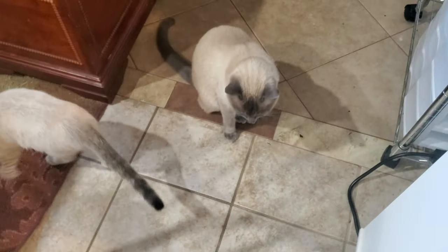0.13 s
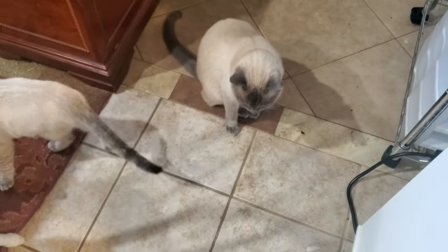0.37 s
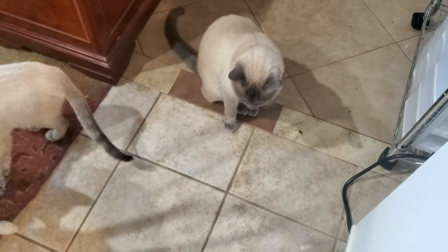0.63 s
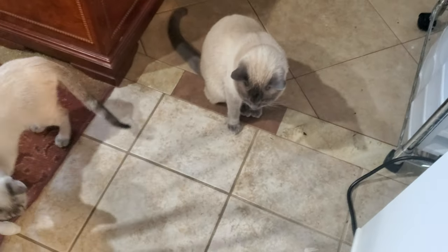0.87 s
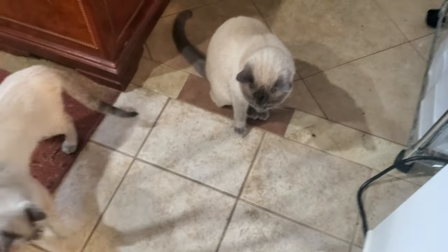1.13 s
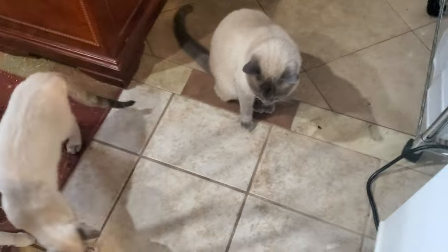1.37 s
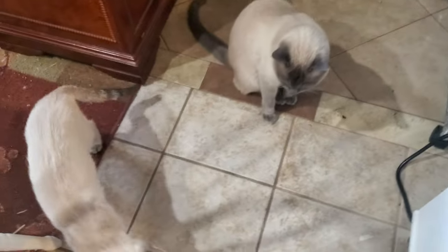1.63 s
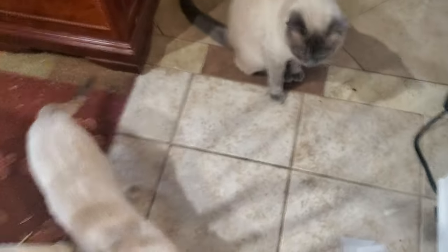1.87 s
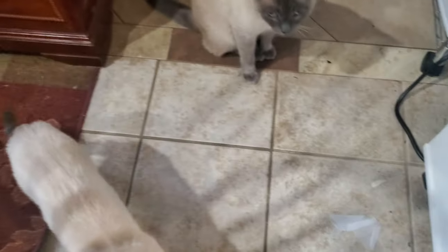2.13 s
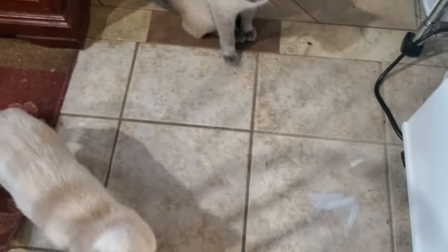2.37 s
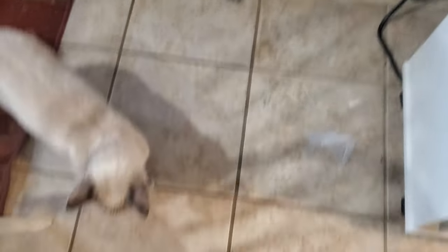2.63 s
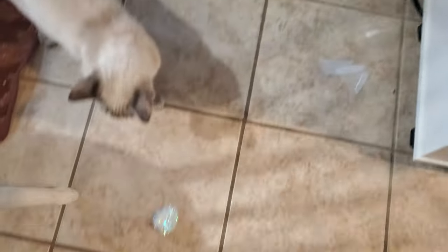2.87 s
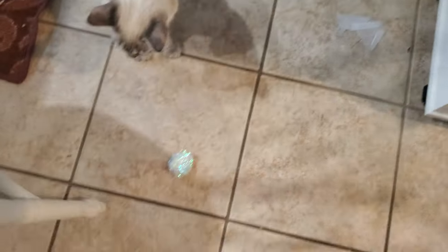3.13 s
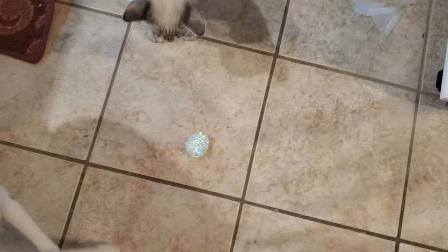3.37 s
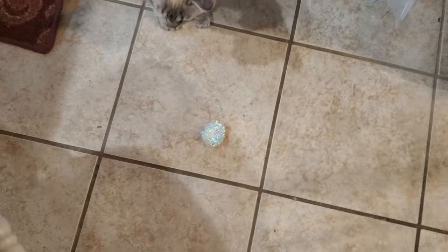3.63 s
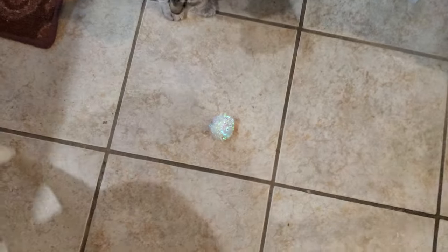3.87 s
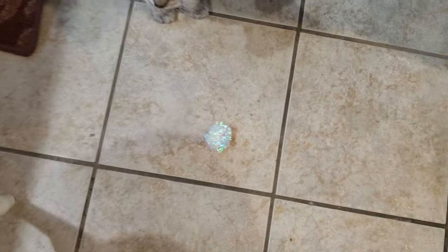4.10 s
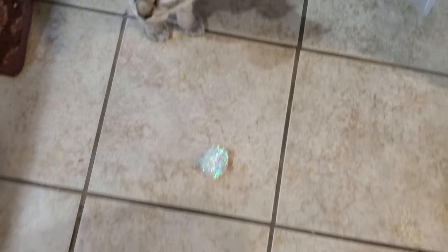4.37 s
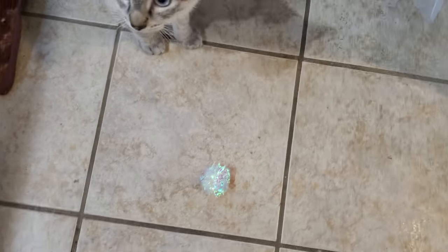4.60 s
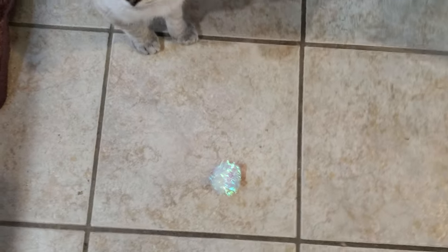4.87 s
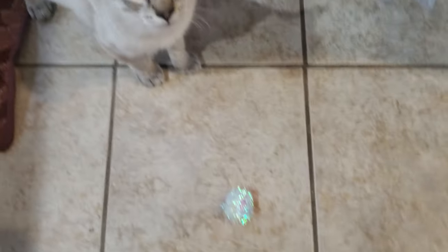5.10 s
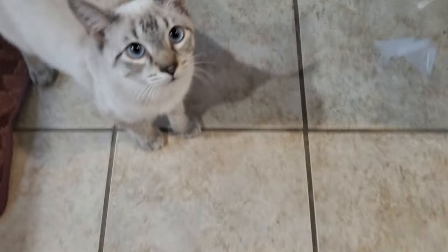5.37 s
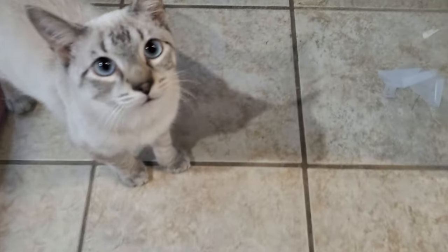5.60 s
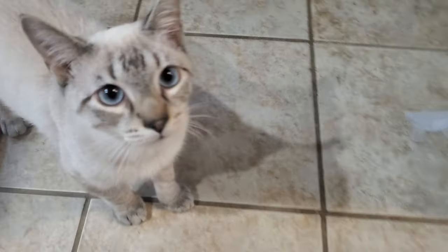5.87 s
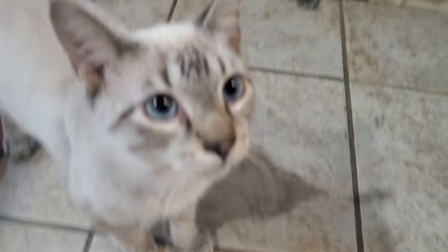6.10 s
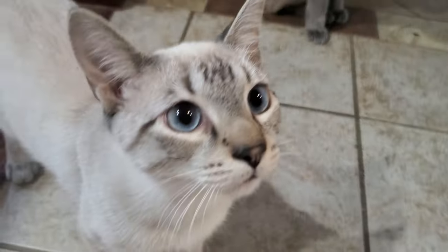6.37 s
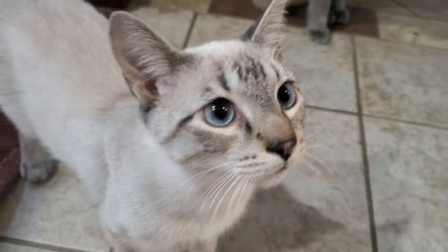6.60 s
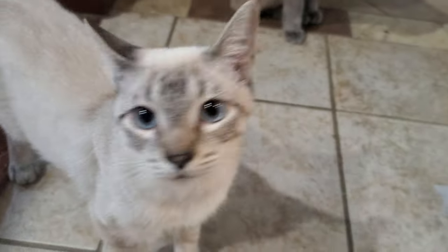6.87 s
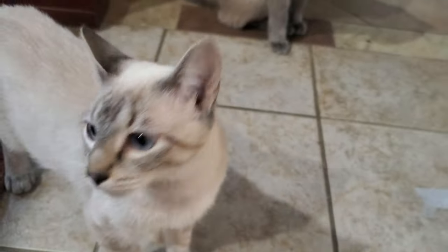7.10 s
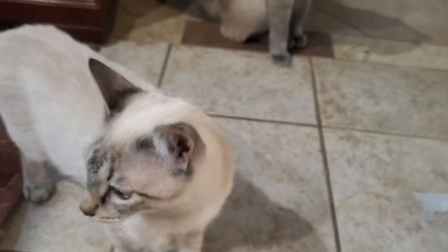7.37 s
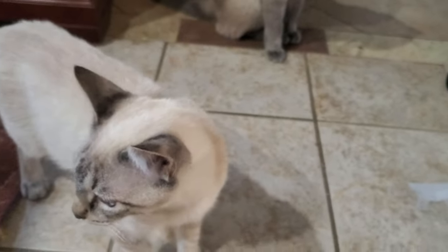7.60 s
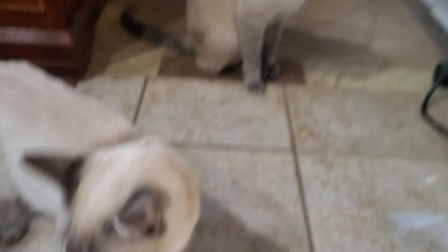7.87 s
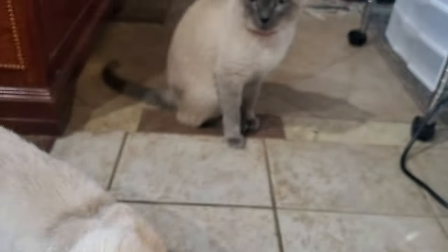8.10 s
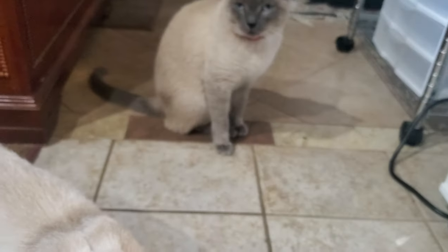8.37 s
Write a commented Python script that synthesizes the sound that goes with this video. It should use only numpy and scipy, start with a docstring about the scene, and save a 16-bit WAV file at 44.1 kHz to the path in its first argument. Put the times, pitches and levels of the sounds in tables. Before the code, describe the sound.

Over a steady room hum, close finger clicks and rubs, then a hollow plastic object trundles and knocks across a tile floor, then soft taps.

```python
"""A steady hum lies under everything; early on, fingers click, rub and thump close by on a hand-held phone.
Then a hollow plastic thing trundles over a kitchen's tile floor, rattling and knocking at the joints, and
the phone is touched again after it. Clicks, grit and knocks are noise pushes that ring tables of resonances;
strokes, soft rustles and hum are shaped noise, and taps are decaying sines.
The phone's two microphone ports make the stereo pair; hard walls answer the cart."""
import sys
import numpy as np
from scipy import signal
from scipy.fft import rfft, irfft, next_fast_len
from scipy.io import wavfile
from scipy.ndimage import map_coordinates

SR = 44100
rng = np.random.default_rng(int(sys.argv[2]) if len(sys.argv) > 2 else 0)


def inscribe(sig):
    """Save sig as 16-bit PCM at rate SR to the path in sys.argv[1].

    A 1-D sig is mono; a 2-D sig holds one channel per row.
    Samples are clipped to [-1, 1] before scaling.
    """
    pcm = np.round(np.clip(np.atleast_2d(sig).T, -1, 1) * 32767)
    wavfile.write(sys.argv[1], SR, pcm.astype(np.int16))


def gain_from_db(level_db):
    """Convert decibel levels to linear amplitude factors (20 dB per decade)."""
    decades = np.asarray(level_db, float) / 20
    return 10 ** decades


N = 373997

# Resonances of the cart's hollow body. Each row: frequency in Hz, width in Hz, level in dB.
BODY_MODES = [(110, 51, -5.5), (208, 65, -1.5), (272.7, 98, 1.5), (562, 45, 6), (660, 123, 3),
              (808, 116, 6.5), (1074, 233, -2), (1394, 600, -7.5)]
# Resonances of its hard shell. Each row: frequency in Hz, width in Hz, level in dB.
SHELL_MODES = [(1574, 390, 1), (1947, 310, -0.5), (2534, 198, 11), (2810, 330, -1), (3300, 400, -4),
               (4140, 360, -12), (5550, 124, -11), (6360, 600, -11.5)]
DETUNE = 0.021  # fraction by which the cart's modes shift
SHELL_BLUR = 2.4  # contact damps the shell and widens its modes by this factor


def unit(x):
    """Brought to rms 1."""
    return x / np.sqrt(np.mean(x ** 2) + 1e-20)


def along(points, hz):
    """Values read from (Hz, value) points on a log frequency axis."""
    f, v = np.transpose(points)
    return np.interp(np.log(hz + 1), np.log(f + 1), v)


def gains(rows):
    """Gain per sample for each dB column after the time; silent before and after."""
    s, *cols = np.transpose(rows)
    return [gain_from_db(np.interp(np.arange(N) / SR, s, c, -140, -140)) for c in cols]


def humps(table, steep):
    """Gain per sample for each dB column after centre and length: swells, squarer as steep grows."""
    rows, t = np.array(table), np.arange(N) / SR
    swells = np.exp(-np.abs(2.18 * (t - rows[:, :1]) / rows[:, 1:2]) ** steep)
    return gain_from_db(rows[:, 2:]).T @ swells


def wobble(rate):
    """A smooth random curve, rate knots a second."""
    knots = rng.standard_normal(int(N * rate / SR) + 4)
    return map_coordinates(knots, [np.arange(N) * rate / SR])


def filtered(x, response):
    """x times a complex response of frequency."""
    n = x.shape[-1]
    m = next_fast_len(n + SR // 4)
    return irfft(rfft(x, m) * response(np.fft.rfftfreq(m, 1 / SR)), m)[..., :n]


def modes(table, order=1):
    """Causal response of (Hz, width, dB) resonances; order 2 has steeper flanks."""
    def response(f):
        total = 0
        for k, (centre, width, db) in enumerate(table):
            resonance = 1j * f * width / (centre ** 2 - f ** 2 + 1j * f * width)
            total = total + (-1) ** (k * order) * gain_from_db(db) * resonance ** order
        return total
    return response


def struck(shape, table, peak_db, blow=0, order=1):
    """Random pushes under shape, led by one firm blow, ring the modes; scaled to its peak."""
    push = shape * rng.standard_normal(len(shape))
    push[np.argmax(shape)] += blow
    ring = filtered(push, modes(table, order))
    return gain_from_db(peak_db) * ring / np.abs(ring).max()


def pair_noise(spectrum, alike):
    """Stereo noise of rms 1 with a (Hz, dB) spectrum, whose sides agree by (Hz, correlation)."""
    def mid_and_side(hz):
        turn = np.arccos(np.clip(along(alike, hz), -1, 1)) / 2
        return gain_from_db(along(spectrum, hz)) * [np.cos(turn), np.sin(turn)]
    mid, side = filtered(rng.standard_normal((2, N)), mid_and_side)
    return unit(np.array([mid + side, mid - side]))


def rolling():
    """Grit under the wheels pushes body and shell steadily, in grains and in small dry crackles."""
    # The push across the tiles, then a short nudge. Each row: time in seconds, body in dB, shell in dB.
    push = [(2.08, -67.5, -50), (2.27, -58, -49.5), (2.31, -46.5, -50), (2.56, -46.5, -48),
            (2.74, -40, -42.5), (3.04, -42.5, -48), (3.2, -36, -44.5), (3.82, -40.5, -46.5),
            (3.93, -34.5, -47), (4.36, -36.5, -43.5), (4.641, -38, -50), (4.8, -61.5, -102),
            (4.955, -66, -55), (4.969, -42, -46.5), (5.052, -41, -51), (5.201, -66.5, -59)]
    # The nudge drags the deep body. Each row: centre in seconds, length in seconds, level in dB.
    drag = [(5.06, 0.12, -41)]
    # Two thin shell modes sing along. Each row: centre and length in seconds, lower and upper mode in dB.
    thin = [(2.85, 0.85, -58.5, -57.5), (3.4, 0.56, -54, -78)]
    grains_per_s, crackles_per_s, crackle_db = 99, 90, -5  # crackles are set against the shell's rub
    waver_db = 3.5  # unevenness of the rub

    grains = (rng.random(N) < grains_per_s / SR) * rng.exponential(size=N)
    # each grain jolts the whole thing for some ms, over the steady rub
    bumps = 1 + signal.lfilter([1], [1, -np.exp(-1 / (SR * 0.0019))], grains)
    body, shell = gains(push)
    deep = body + humps(drag, steep=2.4)[0]
    upper = body * np.where(np.arange(N) < 3.4 * SR, gain_from_db(-7.5), 1)  # upper body modes are damped at first
    thin_low, thin_high = humps(thin, steep=2.2)
    layers = [(deep, BODY_MODES[:3]), (body, BODY_MODES[3:5]), (upper, BODY_MODES[5:]),
              (shell, SHELL_MODES[:5]), (thin_low, SHELL_MODES[5:6]), (thin_high, SHELL_MODES[6:7])]
    out = 0
    for gain, table in layers:
        # each mode wavers between a low and a high form as the wheels meet other grit
        rub = 0
        for hz, width, db in table:
            for way in (-1, 1):
                grit = bumps * gain_from_db(waver_db * wobble(11)) * rng.standard_normal(N)
                rub = rub + filtered(grit, modes([(hz * (1 + way * DETUNE), width, db)], order=2))
        out = out + gain * unit(rub)

    sparks = (rng.random(N) < crackles_per_s / SR) * rng.exponential(size=N) ** 2
    crackle = signal.lfilter([1], [1, -np.exp(-1 / (SR * 0.0013))], sparks) * rng.standard_normal(N)
    damped = [(hz, SHELL_BLUR * width, db / 2) for hz, width, db in SHELL_MODES[:6]]
    return out + shell * gain_from_db(crackle_db) * unit(filtered(crackle, modes(damped, order=2)))


def knocking():
    """Each joint is a firm blow with a dying chatter of loose parts, and one softer rebound."""
    # Knocks at the tile joints. Each row: time in seconds, hollow body in dB, shell in dB, thin snap in dB.
    joints = [(3.1027, -21, -31, -39), (3.4044, -27.5, -26, -46), (3.7035, -14.5, -47, -56),
              (3.8631, -18, -1, -15.5), (3.9969, -7, -11, -36), (4.1472, -9.5, -2, -17),
              (4.2946, -15.5, -22.5, -50), (4.4428, -24, -15.5, -33), (4.5557, -29, -15, -50),
              (4.599, -19.5, -11.5, -30)]
    # Dull bumps that only the body feels. Each row: time in seconds, body in dB.
    dull_bumps = [(2.696, -33), (2.889, -27), (3.293, -26.5), (4.1034, -18.5), (4.618, -17), (5.0254, -27)]
    rebound_s, rebound_body_db, rebound_shell_db = 0.0505, -8.5, -13
    deep_db, chatter_db = -15, -18  # deep body under the hollow body; chatter under the blow's peak
    body_blur, chatter_blur = 1.78, 2  # widening of the modes
    scatter_db, soft_hz = 3.5, 3900  # no two blows land on the same spot; the blow is soft above soft_hz

    soft, snaps = np.zeros((2, N + SR))
    t = np.arange(SR // 6) / SR
    contact = gain_from_db(-60 * t / 0.0292) * (1 - np.exp(-t / 0.001607))
    blows = list(joints) + [(s, db, -140, -140) for s, db in dull_bumps]
    rebounds = [(s + rebound_s, body_db + rebound_body_db, shell_db + rebound_shell_db,
                 thin_db + rebound_shell_db) for s, body_db, shell_db, thin_db in blows]
    for s, body_db, shell_db, thin_db in blows + rebounds:
        loose = np.interp(t, np.arange(70) / 400, rng.standard_normal(70))  # loose parts rattle on unevenly
        chatter = gain_from_db(-60 * t / 0.2 + 7.0 * loose) * (1 - np.exp(-t / 0.0024))
        parts = [(soft, shell_db, SHELL_MODES[:6], SHELL_BLUR),
                 (soft, body_db, BODY_MODES[4:], body_blur),
                 (snaps, thin_db, SHELL_MODES[5:], SHELL_BLUR),
                 (soft, body_db + deep_db, BODY_MODES[:3], body_blur)]
        for track, db, table, blur in parts:
            luck = rng.standard_normal((len(table), 2))
            spot = [(hz * (1 + DETUNE * a), width, level + scatter_db * b)
                    for (hz, width, level), (a, b) in zip(table, luck)]
            damped = [(hz, blur * width, level) for hz, width, level in spot]
            rattling = [(hz, chatter_blur * width, level) for hz, width, level in spot]
            hit = struck(contact, damped, db, blow=2.8, order=2)
            rattle = struck(chatter, rattling, db + chatter_db, order=2)
            track[round(s * SR):][:len(t)] += hit + rattle
    return snaps[:N] + filtered(soft[:N], lambda hz: 1.66 / (1 + 1j * hz / soft_hz) ** 2)


def clicks():
    """A sharp slip of a few ms sets the case ringing; each port feels it through its own path."""
    # Dry clicks close by. Each row: time in seconds, dull part in dB, bright part in dB, left over right in dB.
    slips = [(0.488, -55, -29, 13.5), (0.977, -23.5, -45, -6), (1.003, -30, -34, 1), (1.02, -36, -31, -4),
             (1.039, -26, -41, 19.5), (1.081, -11, -13.5, 15), (1.148, -11.5, -12, 2.5),
             (1.217, -17.5, -19, 24.5), (1.245, -1.5, -21, 1), (1.332, -21, -28, 8), (1.347, -5, -15.5, 8),
             (1.364, -10, -11, 10), (1.371, -19, -47, 16), (1.619, -13, -1.5, 6.5), (1.753, -32.5, -20, 22),
             (1.871, -27.5, -24, 4)]
    # What the case rings with. Each row: frequency in Hz, width in Hz, level in dB.
    case = [(356, 250, 2), (757, 183, 6), (1406, 168, 1), (1930, 335, 9.5), (3080, 450, 6), (3750, 1200, 1),
            (5030, 3800, -9)]
    out, t = np.zeros((2, N + SR)), np.arange(SR // 25) / SR - .004
    # a weak lead-in, then the snap
    shape = np.where(t < 0, 0.32 * gain_from_db(60 * t / 0.0038), gain_from_db(-60 * t / 0.0074))
    for s, dull_db, bright_db, pan_db in slips:
        for port, side_db in zip(out, (pan_db / 2, -pan_db / 2)):
            dull = struck(shape, case[:3], dull_db + side_db)
            bright = struck(shape, case[3:], bright_db + side_db)
            port[round((s - .003) * SR):][:len(t)] += dull + bright
    return filtered(out[:, :N], lambda hz: 1 / (1 + 1j * hz / 9000) ** 2)


def strokes():
    """Skin slides along the case in uneven slips with a hiss on top."""
    # Finger strokes. Each row: centre in seconds, length in seconds, rub in dB, hiss in dB.
    slides = [(.515, 0.072, -48, -45), (.69, 0.077, -46.5, -46), (1.035, 0.068, -43, -39.5),
              (1.24, 0.088, -31, -43), (1.28, 0.034, -29.5, -34.5), (1.36, 0.04, -33, -72),
              (1.763, 0.015, -36.5, -35), (1.888, 0.037, -44, -29), (6.565, 0.12, -37.5, -45.5),
              (7.13, 0.043, -46, -72.5)]
    # Spectrum of the rub. Each row: frequency in Hz, level in dB.
    rub_spectrum = [(100, -13.5), (250, -2), (700, -7.5), (2600, -7.5), (6000, -42), (10000, -58)]
    hiss_spectrum = [(2500, 8.0), (6000, 7), (12000, -8.0), (16000, -1.0)]  # Hz, dB
    rub, hiss = humps(slides, steep=3.1)
    slips = gain_from_db(3 * wobble(400))
    skin = slips * rub * pair_noise(rub_spectrum, [(1000, 0.24)])
    return skin + hiss * pair_noise(hiss_spectrum, [(9000, 0.09)])


def taps():
    """Single soft taps on the case: a low decaying sine, equal at both ports."""
    # Each row: start in seconds, level in dB.
    touches = [(5.495, -37), (5.89, -45), (5.945, -45), (6.191, -34.5), (6.526, -28)]
    tap_hz, decay_s = 65.3, 0.085  # decay_s is the time to fall 60 dB
    out, t = np.zeros(N + SR), np.arange(SR // 5) / SR
    for s, db in touches:
        onset = 1 - np.exp(-t / 0.0037)
        out[round(s * SR):][:len(t)] += gain_from_db(db - 60 * t / decay_s) * np.sin(2 * np.pi * tap_hz * t) * onset
    return out[:N]


def thumps():
    """The grip shifts and thumps the case: swells of low noise, largely alike at the two ports."""
    # Shifts of the grip. Each row: centre in seconds, length in seconds, level in dB.
    shifts = [(.52, 0.16, -55.5), (1.03, 0.075, -40), (1.13, 0.075, -37.5), (1.25, 0.094, -37),
              (1.345, 0.088, -35), (1.763, 0.054, -47), (1.888, 0.057, -36), (3.25, 0.37, -48.5),
              (6.57, 0.13, -47)]
    # Spectrum of a thump. Each row: frequency in Hz, level in dB.
    low_spectrum = [(15, -53), (55, 0.5), (130, -7), (400, -47.5)]
    return humps(shifts, steep=4.8)[0] * pair_noise(low_spectrum, [(50, 0.73)])


def rustle():
    """Fur or cloth brushing: a soft hiss that swells briefly over a slowly changing treble hiss."""
    # Soft rustles. Each row: centre in seconds, length in seconds, level in dB.
    swells = [(1.84, 0.037, -41.5), (2.1, 0.74, -54), (2.85, 0.25, -49), (3.16, 0.13, -54),
              (5.16, 0.094, -48), (6.5, 0.15, -54)]
    # A slowly rising and falling treble hiss under the rustles. Each row: time in seconds, level in dB.
    treble_hiss = [(1.7, -99), (1.9, -49.5), (2.5, -68), (4.1, -48), (4.8, -59), (7.5, -75)]
    # Spectrum of the hiss. Each row: frequency in Hz, level in dB.
    fabric = [(1200, -49), (2800, 14.5), (6700, 14), (8500, 5), (15000, 2)]
    level = humps(swells, steep=1.46)[0] + gains(treble_hiss)[0]
    return level * gain_from_db(1.35 * wobble(28)) * pair_noise(fabric, [(3000, 0.18), (9000, 0.014)])


def room(x, count=20):
    """Hard walls answer, differently at each port and in each stretch of time; decay varies with pitch."""
    # Each row: frequency in Hz, time to fall 60 dB in seconds.
    decay = [(200, 0.079), (9000, 0.39)]
    out = np.zeros((2, N + SR))
    for part in np.array_split(np.arange(N), count):
        hz, t, z = signal.stft(rng.standard_normal((2, SR // 3)), SR, nperseg=256)
        fading = z * gain_from_db(-60 * t / along(decay, hz)[:, None])
        tail = signal.istft(fading, SR, nperseg=256)[1]
        answer = signal.fftconvolve(x[None, part], tail / np.linalg.norm(tail[0]), axes=1)
        out[:, part[0] + 200:][:, :answer.shape[1]] += answer  # the answer comes 200 samples late
    return out[:, :N]


def hum():
    """The steady noise of the room and its appliances, drifting slightly in level."""
    # Spectrum of the hum. Each row: frequency in Hz, level in dB.
    spectrum = [(20, -21), (76, -4.5), (225, -11.5), (280, -5.5), (633, -3.5), (1000, -14.5), (1260, -2),
                (1500, -6.5), (3200, -11), (4130, -24), (6910, -14.5), (8140, -35), (16500, -37.5)]
    # How far the ports agree. Each row: frequency in Hz, correlation from 0 to 1.
    alike = [(100, 0.87), (2000, 0.39), (10000, 0.64)]
    return gain_from_db(-54.5 + 0.74 * wobble(3.66)) * pair_noise(spectrum, alike)


def scene():
    """All sources at the two ports; cart, its echo and hum come through the air with the ports' colour."""
    # Left port over right port. Each row: frequency in Hz, difference in dB.
    ports = [(300, -2.5), (1600, -7), (8000, -18), (14000, 14)]
    cart = rolling() + knocking()
    far = cart * gain_from_db([[2.2], [-2.2]]) + gain_from_db(-4.0) * room(cart) + hum()
    airborne = filtered(far, lambda hz: gain_from_db(along(ports, hz) / 2 * np.array([[1], [-1]])))
    return airborne + clicks() + strokes() + taps() + thumps() + rustle()


def top_cut(x):
    """Nothing passes above the cut-off."""
    return signal.sosfilt(signal.butter(12, 16640, fs=SR, output="sos"), x)


def record(dry):
    """Sound reaches the left port first; the top is rolled off; the loudest peaks round off."""
    left_lead_s, top_hz, above_db = 11 / SR, 15900, -25
    sides = np.array([[1], [-1]])
    x = filtered(dry, lambda hz: np.exp(1j * np.pi * hz * left_lead_s * sides))
    x = filtered(x, lambda hz: np.where(hz < top_hz, 1, gain_from_db(above_db)))
    x = x / (1 + np.abs(x) ** 8) ** (1 / 8)
    return top_cut(x)


dry = scene()
out = record(dry)
inscribe(out)
```